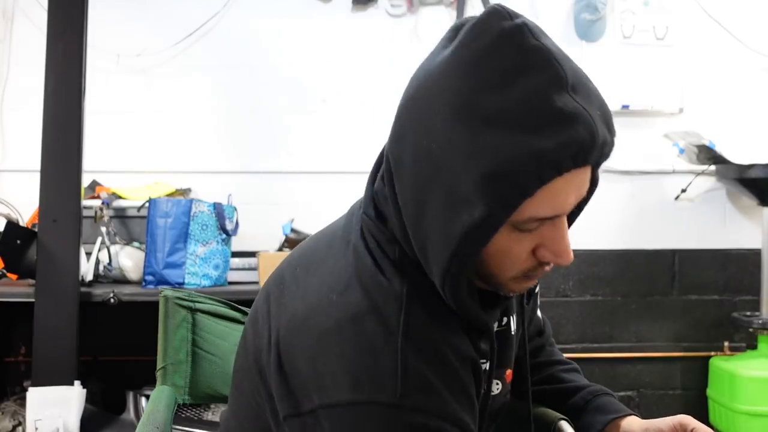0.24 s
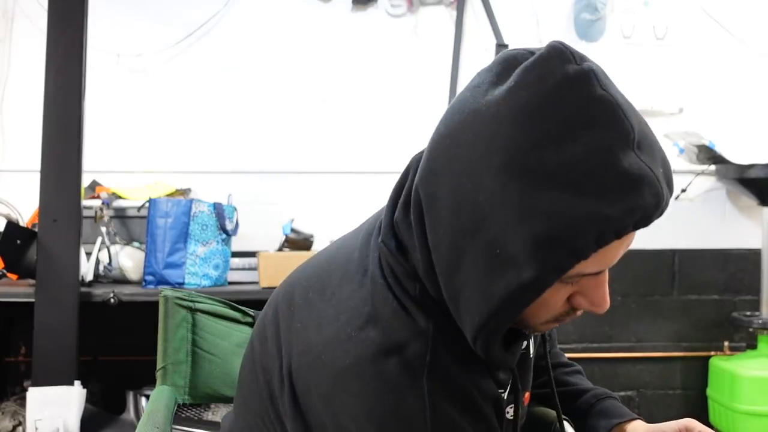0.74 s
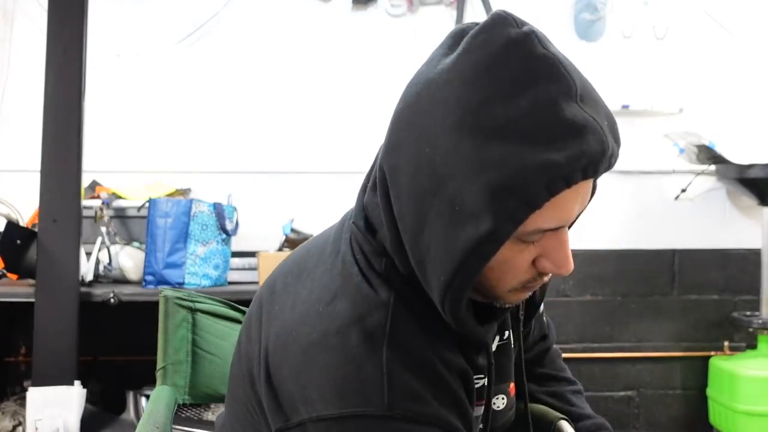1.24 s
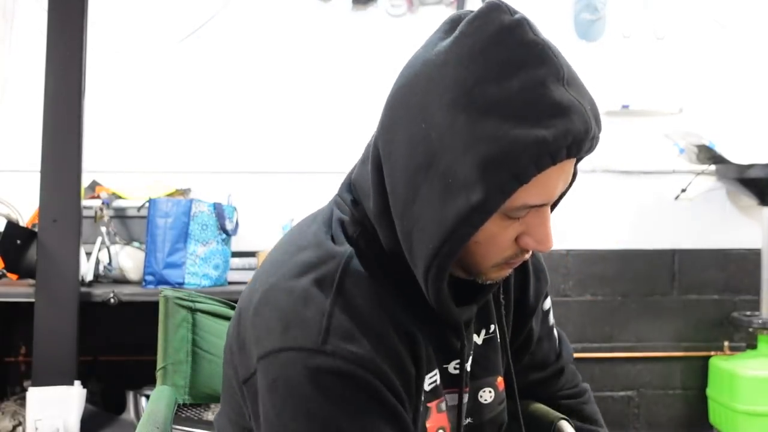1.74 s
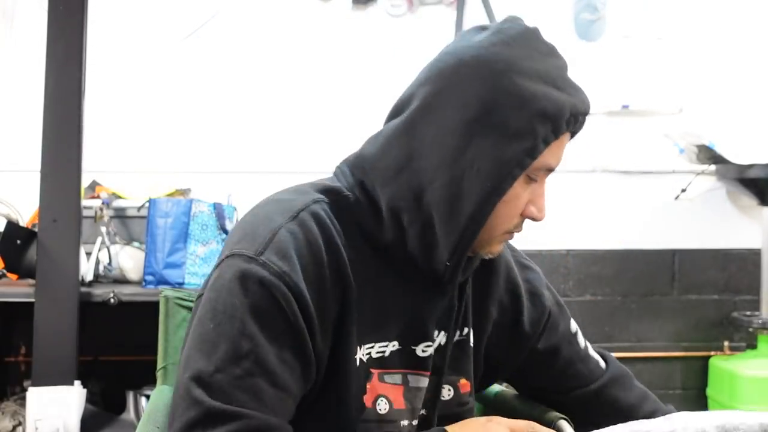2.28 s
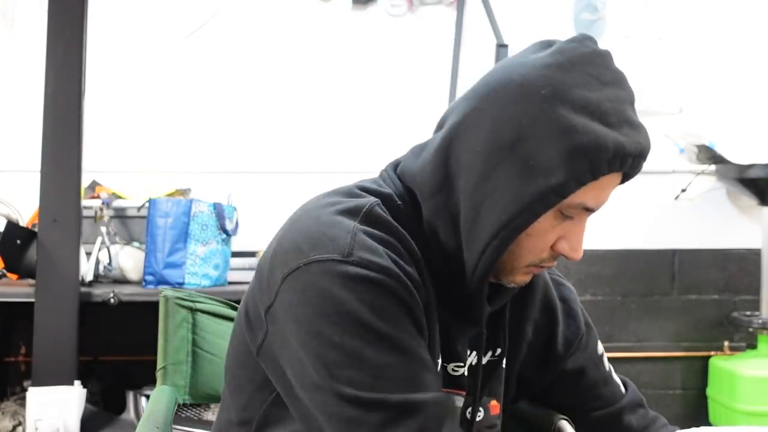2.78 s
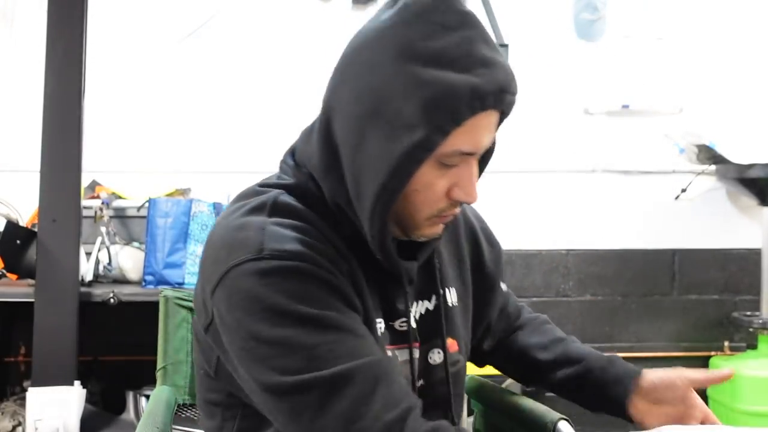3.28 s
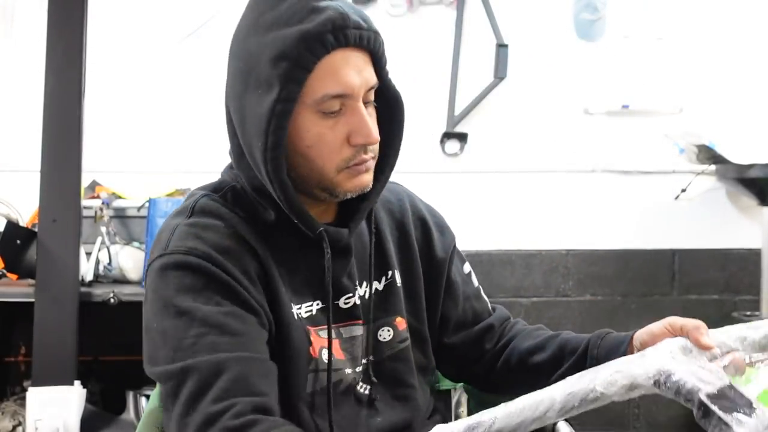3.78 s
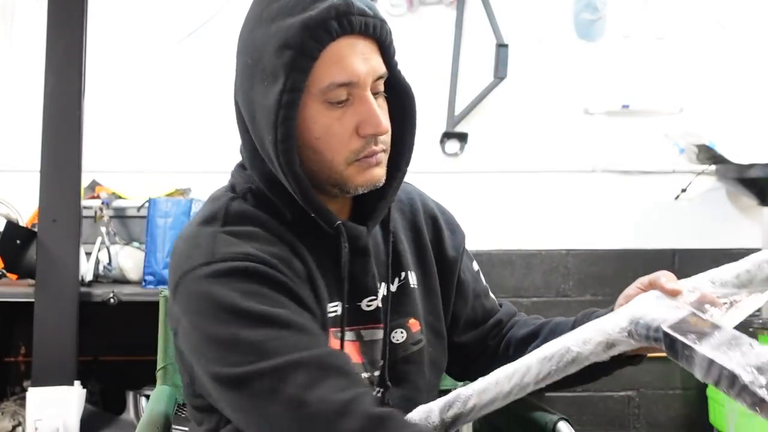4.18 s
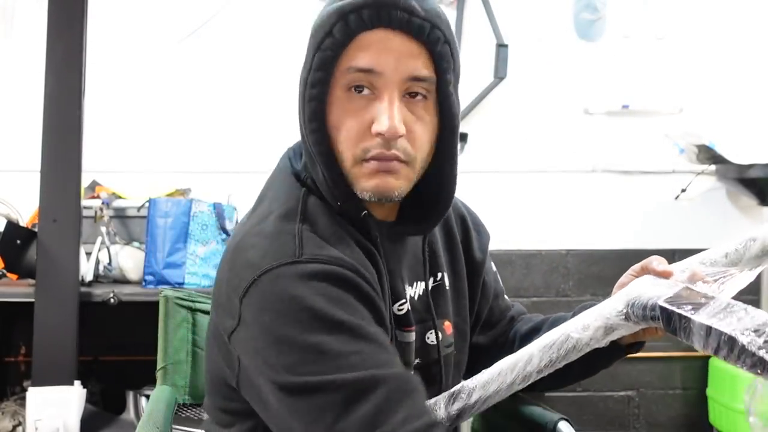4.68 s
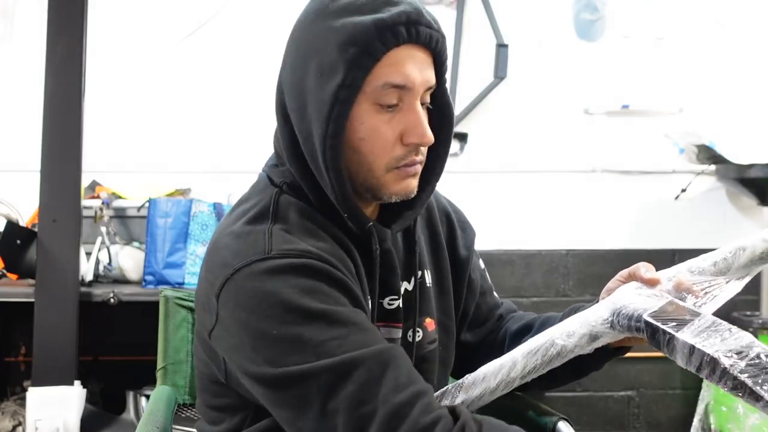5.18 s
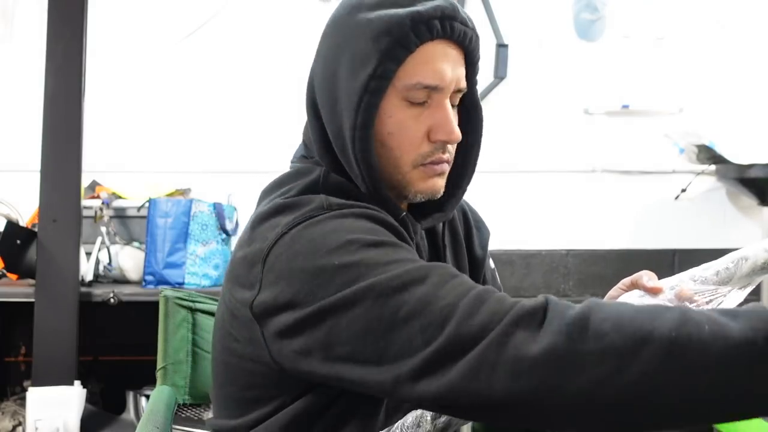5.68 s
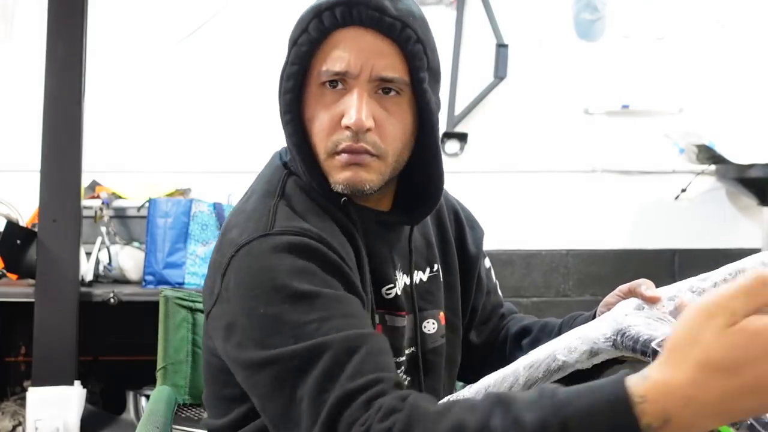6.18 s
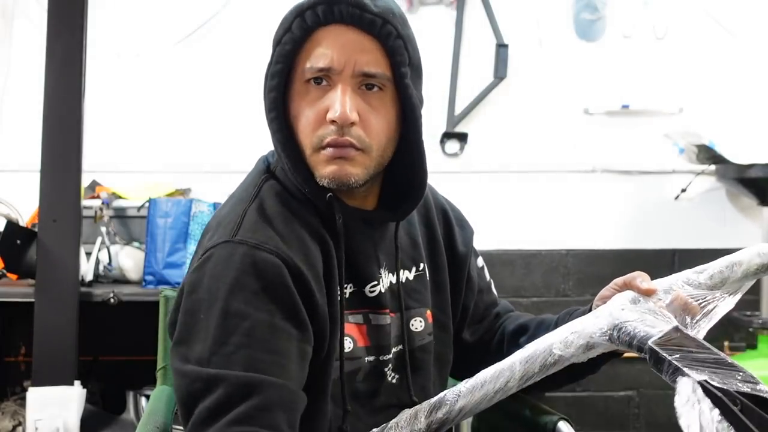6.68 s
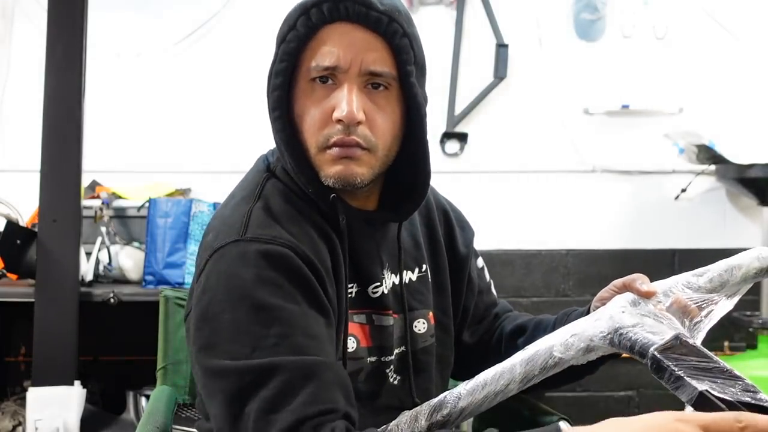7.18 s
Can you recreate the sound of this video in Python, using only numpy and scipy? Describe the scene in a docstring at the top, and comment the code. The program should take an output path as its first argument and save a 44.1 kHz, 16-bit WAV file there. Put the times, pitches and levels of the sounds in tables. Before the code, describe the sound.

Plastic film crinkles in irregular bursts as hands shift and unwrap metal bars. Sharp snaps and short rasps of film dragging on itself break through the fine crackle, and a bar briefly scrapes with a dull ring. The crinkling gets louder and busier in the middle, pauses, surges again, then thins out over a faint low drone. It sounds close, with a short garage echo.

```python
"""Clear plastic film crinkles as hands shift and unwrap metal bars in a garage.
The film buckles in countless tiny creases and a few sharp snaps, and rasps as it drags over itself.
A bar scrapes and rings dully under its wrap, and clothes rustle. A near surface and the room
throw these sounds back, over a faint hum and a low drone that swells near the end."""
import sys
import numpy as np
from scipy import signal
from scipy.fft import rfft, irfft
from scipy.io import wavfile

SR = 44100
rng = np.random.default_rng(int(sys.argv[2]) if len(sys.argv) > 2 else 0)


def unload_audio(sound):
    """Save the sound as a 16-bit wav file, at the path given as the first command line argument."""
    columns = np.transpose(np.atleast_2d(sound))
    # keep every value between -1 and 1, then stretch to whole-number steps
    steps = np.round(np.clip(columns, -1, 1) * 32767)
    wavfile.write(sys.argv[1], SR, steps.astype(np.int16))


N = 328236
TIME = np.arange(N) / SR

# Levels in the tables are relative: the functions set the final loudness.
# the film's crinkle, its deeper flexing body and its fine fizz: (frequency [Hz], level [dB])
CRINKLE_TONE = [(300, -41), (800, -30.5), (1300, -6.5), (2200, -2), (3500, -2), (5500, -2.5), (7000, -5.5),
                (9000, -15), (11000, -32.5), (16000, -49.5)]
BODY_TONE = [(45, -59), (82, -9), (110, -7), (170, 5), (280, -2), (430, -4), (650, -0.5), (1000, 3),
             (1400, 3), (2200, -6), (5000, -21)]
FIZZ_TONE = [(3000, -31.5), (5200, -1), (6500, 3.5), (8200, 3.5), (9800, 1), (11200, -2.5), (13500, -4.5),
             (16000, -7)]
# hands crumpling the film: (start [s], length [s], crinkle [dB], body offset [dB], fizz offset [dB])
HAND_STROKES = [(0.0, 0.17, -42, -4, -5), (0.181, .085, -34.5, -6.5, -5), (0.606, 0.058, -35.5, -4.5, -5.5),
                (0.657, 0.071, -31.5, -5.5, -2.5), (0.81, 0.095, -36.5, -4.5, -7.5),
                (0.93, 0.22, -38.5, -8.5, -5), (1.227, 0.035, -41, -19, -1), (1.281, 0.04, -35.5, -20, -6),
                (1.434, .11, -40.5, -10.5, -4.5), (1.642, 0.35, -41.5, -15, -4.5),
                (1.879, 0.19, -33.5, -11, -4), (2.002, 0.13, -31.5, -7, -8.5), (2.106, 0.053, -32.5, -4, 1),
                (2.303, .13, -38.5, -6.5, -6.5), (2.468, 0.26, -42, -11.5, -4.5),
                (2.584, .14, -45, -10, -4.5), (2.87, 0.13, -49.5, -17, 3), (3.15, 0.057, -44, -15, 0),
                (3.203, 0.066, -33, -8, -2.5), (3.375, .065, -37, -10.5, -9), (3.449, 0.034, -32, -6, -0.5),
                (3.498, 0.22, -34, -2.5, -4), (3.729, 0.052, -28, -7.5, -3.5),
                (3.917, 0.056, -35.5, -5, -3), (3.962, 0.12, -30.5, -10, -4.5),
                (4.087, 0.043, -42.5, -2, -2), (4.225, 0.1, -29.5, -10.5, -4),
                (4.334, .15, -37.5, -7, -3.5), (4.647, 0.039, -39.5, -20, -5), (5.497, 0.26, -41, -4.5, -3),
                (5.59, 0.17, -31.5, -7.5, -4), (5.793, .18, -27, -6.5, -3), (6.112, 0.11, -41, -10, -2),
                (6.213, 0.12, -37, -11.5, -2), (6.412, 0.13, -40.5, -15, -0.5),
                (6.604, .075, -39.5, -20, -1.5), (6.73, 0.1, -38, -11.5, -6)]
# the wrap stirring under resting hands: (time [s], level [dB])
WRAP_STIR = [(0, -45), (.32, -45.5), (.46, -56.5), (.58, -58), (.75, -42.5), (1.38, -46.5), (1.6, -49),
             (2.3, -45), (2.85, -49), (3.12, -49), (3.3, -43), (3.88, -43), (4.76, -47), (5.0, -54.5),
             (5.19, -56.5), (5.5, -42.5), (6.84, -45), (7.0, -54)]
# a person leaning in a chair: (start [s], length [s], sleeve rustle [dB], rumble [dB])
CHAIR_LEANS = [(0, 0.29, -57, -70), (0.305, 0.24, -59, -78), (0.643, 0.1, -53, -74),
               (0.805, 0.64, -57.5, -72), (1.85, 0.45, -57.5, -62), (3.2, 0.071, -52, -72),
               (3.55, 0.24, -61, -59), (3.91, 0.29, -55.5, -72), (5.56, 0.34, -54.5, -72)]
# rustling clothes and low rumble: (frequency [Hz], level [dB])
CLOTH_TONE = [(50, -27.5), (100, -5.5), (150, -4), (185, -3), (216, 1.5), (255, -3), (330, -8.5),
              (500, -21), (1500, -33)]
RUMBLE_TONE = [(28, -34), (45, -6), (75, 4), (125, -5.5), (200, -9), (500, -52)]
# room air, and the part that differs between left and right: (frequency [Hz], level [dB])
AIR_TONE = [(20, -34), (33, -13), (50, 1), (80, 3), (130, 9.5), (210, 10), (300, 5.5), (450, -1), (1000, 0),
            (3000, -7), (8000, -13), (16000, -35)]
AIR_WIDTH = [(40, -20), (100, -14), (300, -11), (2000, -9), (8000, -10), (15000, -16)]
# the notes of the hum and of the drone: (frequency [Hz], level [dB])
HUM_NOTES = [(80.7, -71.5), (161.5, -85), (242.2, -91)]
DRONE_NOTES = [(48.4, -70), (82, -62), (140, -69.5), (177, -71.5)]
# the drone's swell: (time [s], level [dB])
SWELL = [(6.25, -16), (6.5, -11), (6.68, -2), (6.8, 2), (7.0, 1.5), (7.3, 3), (7.44, -7)]
# big creases giving way: (time [s], level [dB], pitch [Hz], offset of the knock on the bar [dB])
BIG_SNAPS = [(0.076, -21, 1800, -8), (0.5882, -30, 2500, 1), (0.6474, -16, 2000, -7),
             (0.6756, -8, 1770, -1.5), (1.0215, -16, 1560, -4), (2.329, -13.5, 1320, 2),
             (2.3859, -18, 1370, -10), (2.4155, -17, 1310, 5.5), (2.604, -16.5, 1180, -3),
             (2.965, -24, 1500, -8), (3.3858, -11.5, 2000, -16), (3.4585, -10.5, 4500, -22),
             (3.619, -8.5, 1170, 1.5), (3.7564, -5, 2450, -4), (3.9734, -3.5, 1550, -13),
             (4.0151, -6.5, 2010, -11), (4.2013, -13.5, 2560, -3), (4.2435, -5.5, 2400, -4.5),
             (4.2473, -10.5, 3000, -3), (4.3372, -10.5, 2000, -6), (4.6606, -17.5, 2580, -12),
             (4.861, -22, 3000, -24), (4.8688, -6, 3460, -14), (4.8758, -20, 4000, -26),
             (5.0776, -26, 3700, -30), (5.4915, -4.5, 3130, -10.5), (5.5444, -12.5, 3360, -26),
             (5.6603, -8, 5770, -18), (5.7964, -6, 2830, -4), (5.9536, -11, 2380, -5),
             (6.6195, -17.5, 3200, -6), (6.6931, -19.5, 3800, -20), (7.1221, -32, 3520, -21.5),
             (7.2315, -29, 3230, -28), (7.252, -28, 3230, -25), (7.2742, -29, 3020, -25),
             (7.3315, -22.5, 4230, -33.5), (7.379, -26, 4800, -31)]
# the crack of a snap: (frequency [Hz], level [dB])
SNAP_TONE = [(40, -54), (150, -19), (400, -9.5), (950, -2.5), (2000, -2.5), (3400, 1), (4000, 0.5),
             (4600, -5), (5600, 0), (9000, -1), (11500, -12), (16000, -24)]
# the wrapped bar's own notes: (frequency [Hz], level [dB], time to fade by 60 dB [s])
BAR_NOTES = [(885, 14, 0.038), (988, -1, 0.098), (1068, 2, 0.09), (1152, 13.5, 0.029), (1270, 4, 0.17),
             (1563, 7, 0.095), (1692, 3, 0.078), (1940, -48, 0.034), (2180, -15, 0.068)]
# film dragged over film: (start [s], length [s], level [dB], centre [Hz], rough width [Hz])
FILM_DRAGS = [(0.671, 0.042, -24, 3470, 1980), (2.033, 0.18, -27.5, 2140, 1700),
              (3.452, 0.036, -25, 4600, 1100), (3.524, 0.033, -25, 2500, 2000),
              (3.556, 0.11, -37, 450, 348), (3.962, 0.053, -36.5, 560, 550),
              (4.239, 0.036, -24, 2440, 1800), (4.243, 0.048, -38.5, 545, 350),
              (4.867, 0.026, -28, 3430, 2200), (4.884, 0.114, -45.5, 1010, 300),
              (5.252, 0.17, -39.5, 3170, 3400), (5.755, 0.1, -28, 1580, 392),
              (5.791, 0.04, -22.5, 3600, 2200), (5.883, 0.065, -21, 1430, 890)]
# one bar sliding on another: (start [s], length [s], level [dB])
BAR_SLIDES = [(2.293, 0.057, -30.5), (2.366, 0.059, -30), (2.503, 0.033, -37.5), (2.604, .04, -42),
              (2.73, 0.032, -41.5)]
# the rub where the bars touch: (frequency [Hz], level [dB])
CONTACT_TONE = [(600, -33), (900, -27), (1200, -9), (1900, -12), (3000, -14), (5000, -30)]
# how long the garage rings: (frequency [Hz], time to fade by 60 dB [s])
GARAGE_FADE = [(100, 0.16), (400, 0.52), (1000, 0.4), (3000, 0.46), (7000, 0.44), (15000, 0.35)]
# left-right balance: (frequency [Hz], left minus right [dB])
BALANCE = [(60, -.5), (140, -1), (330, -1.5), (600, -2.4), (1200, -1.8), (2100, -2.5), (3000, -.8),
           (3900, -.3), (5000, -1.5), (6300, -3.5), (8100, -2.5), (9500, -0.5), (12000, -0.5),
           (15000, -6.5)]
# the part of the echoes that differs between left and right: (frequency [Hz], level [dB])
ECHO_WIDTH = [(100, -11), (400, -12), (1200, -13.5), (2800, -16), (4000, -19), (5000, -14), (9300, -14.5),
              (10000, -6.5), (12200, -5.5), (13200, -19)]


def amp(db):
    """Turns decibels into a number to multiply by."""
    return 10 ** (np.asarray(db) / 20)


def unit(x):
    """Scales a signal to an average strength (rms) of 1."""
    return x / np.sqrt(np.mean(x ** 2) + 1e-20)


def read(points, hz):
    """Looks up a frequency in a table, blending between rows on a pitch scale."""
    freqs, values = np.transpose(points)
    return np.interp(np.log(hz + 1), np.log(freqs + 1), values)


def curve(rows):
    """Joins (time, value) points with straight lines."""
    return np.interp(TIME, *np.transpose(rows))


def add(mix, start, sound):
    """Mixes a sound in at a start time in seconds."""
    part = mix[max(round(start * SR), 0):][:len(sound)]
    part += sound[:len(part)]


def colour(x, tone, size=4096):
    """Shapes bass and treble by a table; clicks keep their sharp starts."""
    log_gain = np.log(amp(read(tone, abs(np.fft.fftfreq(size, 1 / SR)))))
    taps = np.fft.ifft(np.exp(np.conj(signal.hilbert(log_gain)))).real
    return signal.oaconvolve(x, taps[:size // 2])[:N]


def wander(rate_hz):
    """A smooth random wobble, mostly slower than the given rate."""
    hz = np.fft.rfftfreq(N, 1 / SR)
    return unit(irfft(rfft(rng.standard_normal(N)) / (1 + (hz / rate_hz) ** 4), N))


def clicks(per_s, spread_db, ceiling):
    """Random clicks: many small, a few large."""
    size_db = spread_db * np.minimum(rng.exponential(1, N), ceiling)
    return (rng.random(N) < per_s / SR) * rng.choice([-1, 1], N) * amp(size_db)


def stroke(start, length, attack_s=0.0083, release_s=0.031, arch_db=2):
    """The loudness of one movement: it builds, peaks midway and dies away."""
    age = TIME - start
    build = .5 + .5 * np.tanh(age / (2 * attack_s))
    arch = np.sin(np.pi * np.clip(age / length, 0, 1))
    fade = np.exp(-np.clip((age - length) / release_s, 0, 20))
    return build * amp(arch_db * (arch - 1)) * fade


def handling():
    """Hand strokes and the stirring wrap together set the strength of the film's sound."""
    stir = amp(curve(WRAP_STIR))
    power = np.outer(amp([0, -10, -3.5]), stir) ** 2  # crinkle, body, fizz
    for start, length, db, body_db, fizz_db in HAND_STROKES:
        gains = amp([db, db + body_db, db + fizz_db])
        power += np.outer(gains, stroke(start, length)) ** 2
    return np.sqrt(power)


def patch(hz, cycles, size=400):
    """A small patch of film flips over and rings briefly."""
    turns = hz * np.arange(size) / SR
    ring = np.exp(-turns / cycles) * np.cos(2 * np.pi * turns)
    return ring / np.linalg.norm(ring)


def creases(low_hz, high_hz, per_s, spread_db, cycles, shift_db, count=12):
    """Patches of many sizes buckle; which sizes stand out shifts as the folds move."""
    out = np.zeros(N)
    for hz in np.geomspace(low_hz, high_hz, count):
        flips = clicks(per_s / count, spread_db, ceiling=3.03) * amp(shift_db * wander(12.0))
        out += np.sqrt(hz) * signal.oaconvolve(flips, patch(hz, cycles))[:N]
    return unit(out)


def film(crinkle_gain, body_gain, fizz_gain):
    """Creases pop, tight panels ring and film hisses on film, in clumps as the hands grip and slip."""
    grip = amp(wander(31))
    rub = unit(clicks(per_s=12000, spread_db=2.5, ceiling=2.7))
    crackle = creases(1204, 11100, per_s=2400, spread_db=2.5, cycles=1.52, shift_db=-0.5)
    flex = creases(239.5, 2160, per_s=2500, spread_db=3, cycles=1.24, shift_db=-0.5)
    panels = creases(800, 10000, per_s=900, spread_db=3.5, cycles=14, shift_db=2, count=30)
    hiss = unit(clicks(per_s=14000, spread_db=0.5, ceiling=5))
    crinkle = crinkle_gain * unit(colour(crackle + 1.03 * rub + 0.62 * panels, CRINKLE_TONE))
    body = body_gain * unit(colour(flex + 0.63 * rub, BODY_TONE))
    fizz = fizz_gain * unit(colour(crackle + 2.17 * hiss, FIZZ_TONE))
    return grip * (amp(-0.6) * crinkle + amp(-1.38) * body + amp(0.35) * fizz)


def cloth():
    """Each lean brings a soft rustle of heavy clothes and a low rumble of shifting weight."""
    rustle = unit(colour(rng.standard_normal(N), CLOTH_TONE))
    rumble = unit(colour(rng.standard_normal(N), RUMBLE_TONE))
    out = np.zeros(N)
    for start, length, rustle_db, rumble_db in CHAIR_LEANS:
        lean = stroke(start, length, attack_s=0.014, release_s=0.14)
        out += lean * (amp(rustle_db) * rustle + amp(rumble_db) * rumble)
    return out


def wavering(notes, drift_hz):
    """Pure notes that waver in pitch and strength."""
    out = np.zeros(N)
    for hz, db in notes:
        strength = amp(db + 2.2 * wander(4))
        pitch = hz + drift_hz * wander(6.7)
        out += strength * np.sqrt(2) * np.sin(2 * np.pi * np.cumsum(pitch) / SR)
    return out


def background():
    """Soft room air, a faint hum, and a rumbling drone that swells near the end."""
    mid, side = (unit(colour(rng.standard_normal(N), AIR_TONE, size=16384)) for _ in range(2))
    side = colour(side, AIR_WIDTH)
    air = amp(-60) * np.array([mid + side, mid - side])  # left, right
    hum = wavering(HUM_NOTES, drift_hz=1.25)
    rumble = amp(-65.5) * unit(colour(rng.standard_normal(N), RUMBLE_TONE))
    drone = amp(-2.5) * wavering(DRONE_NOTES, drift_hz=2.26) + rumble
    return air + hum + amp(curve(SWELL)) * drone


def snaps(rows):
    """A tight crease gives way with a crack, sets off smaller ones, and jolts the bar."""
    cracks, knocks = np.zeros(N), np.zeros(N)
    t = np.arange(SR // 40) / SR
    fade = 0.16 * np.exp(-t / 0.00056) + 0.023 * np.exp(-t / 0.0042)
    for start, db, hz, knock_db in rows:
        chain = rng.standard_normal(len(t)) * fade
        chain[0] = 1  # the first, biggest crack
        crack = np.convolve(chain, patch(hz, cycles=0.75))[:len(t)] + .5 * chain
        add(cracks, start, amp(db + 7.0) * crack / np.linalg.norm(crack))
        add(knocks, start, amp([db + knock_db + 3]))
    return colour(cracks, SNAP_TONE) + bar(knocks)


def bar(blows):
    """Blows make the bar ring, and the wrap quickly deadens it."""
    t = np.arange(SR // 2) / SR
    ring = sum(amp(db - 60 * t / fade_s) * np.sin(2 * np.pi * (hz * t + rng.random()))
               for hz, db, fade_s in BAR_NOTES)
    bass_cut = signal.butter(3, 700, "high", fs=SR, output="sos")  # the bar's ring carries no bass
    ring = signal.sosfilt(bass_cut, ring)
    return signal.oaconvolve(blows, ring / np.linalg.norm(ring))[:N]


def ticks(effort, per_s=8, centre_hz=2860, spread_octaves=0.43, knock_db=-20):
    """Smaller snaps come by chance, louder when the film is worked harder."""
    step = SR // 100
    slots = np.arange(0, N, step)
    happens = rng.random(len(slots)) < per_s * step / SR
    size, pitch = rng.standard_normal((2, len(slots)))
    db = 20 * np.log10(effort[slots]) + 15 + 1.5 * np.clip(size, -2, 2)
    start = (slots + rng.integers(0, step, len(slots))) / SR
    hz = centre_hz * 2 ** (spread_octaves * pitch)
    return snaps([(start[k], db[k], hz[k], knock_db) for k in np.flatnonzero(happens)])


def drags():
    """Stretched film sticks and slips very fast, rasping around its own pitch."""
    out = np.zeros(N)
    for start, length, db, hz, width_hz in FILM_DRAGS:
        slips = clicks(per_s=4000, spread_db=6.5, ceiling=1.5)[:int(length * SR)]
        band = signal.iirpeak(hz, hz / (1.33 * width_hz), SR)
        rasp = signal.lfilter(*band, signal.lfilter(*band, slips))
        add(out, start, amp(db - 7) * unit(rasp) * signal.windows.tukey(len(rasp), .4))
    return out


def scrape():
    """Metal slips unevenly under the film and sets the bar ringing."""
    slips = clicks(per_s=1100, spread_db=3.5, ceiling=3)
    contact = colour(slips, CONTACT_TONE)
    push = sum(amp(db) * stroke(start, length) for start, length, db in BAR_SLIDES)
    return push * (amp(-11.0) * unit(bar(slips)) + amp(-7.5) * unit(contact))


def reflections(echo_s=0.007):
    """Two random echo patterns: a bounce off a near surface, then the room's fading tail."""
    shape = (2, SR * 3 // 4)
    bounces = rng.standard_normal(shape) * (rng.random(shape) < 5000 / SR)
    hz, t, bands = signal.stft(bounces, SR, nperseg=256)
    fade = amp(-60 * t / read(GARAGE_FADE, hz)[:, None])
    tails = signal.istft(bands * fade, SR, nperseg=256)[1]
    age = np.arange(tails.shape[1]) / SR
    tails *= np.clip(age / 0.011, 0, 1)  # the tail takes a moment to build
    echo = rng.standard_normal(tails.shape) * (age > echo_s) * np.exp(-abs(age - echo_s) / 0.00036)
    return amp(-6.0) * tails / np.linalg.norm(tails[0]) + amp(-11.5) * echo / np.linalg.norm(echo[0])


def garage(x, count=6, changes_per_s=70):
    """Creases lie all over the wrap, so their echoes reach left and right by changing paths."""
    place = changes_per_s * TIME
    echoes = np.zeros((2, N))
    for k in range(count):
        share = np.sin(np.pi / 2 * np.minimum((place - k) % count, 2))  # each path fades into the next
        echoes += signal.oaconvolve((x * share)[None], reflections(), axes=1)[:, :N]
    mid = x + echoes[0]
    ratio = amp(read(BALANCE, np.fft.rfftfreq(N, 1 / SR)))  # left over right
    side = irfft(rfft(mid) * (ratio - 1) / (ratio + 1), N) + colour(echoes[1], ECHO_WIDTH)
    return np.array([mid + side, mid - side])


def scene():
    """Film, bars and clothes echo in the garage, over its background sound."""
    crinkle, body, fizz = handling()
    room = background()
    sources = film(crinkle, body, fizz) + drags() + scrape() + cloth()
    sources += snaps(BIG_SNAPS) + ticks(crinkle)
    return garage(sources) + room


def record(dry, ceiling=0.68, cutoff_hz=15900):
    """Rounds off the loudest peaks, then removes the very highest treble."""
    rounded = ceiling * np.tanh(dry / ceiling)
    treble_cut = signal.firwin(511, cutoff_hz, window=("kaiser", 9), fs=SR)
    return signal.oaconvolve(rounded, treble_cut[None], "same")


dry = scene()
out = record(dry)
unload_audio(out)
```